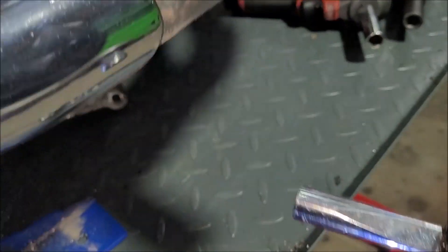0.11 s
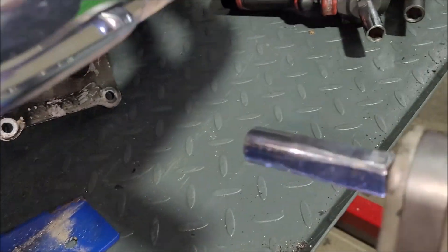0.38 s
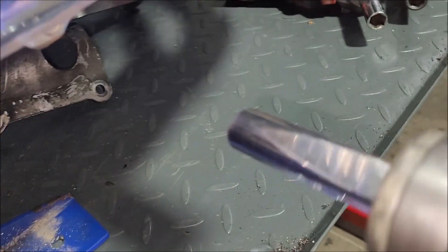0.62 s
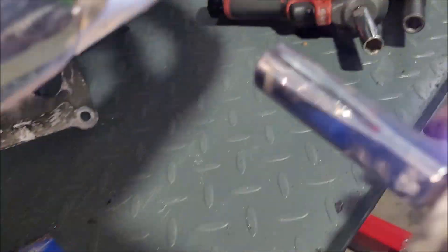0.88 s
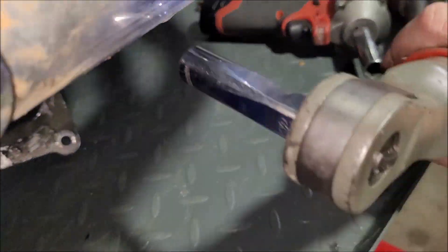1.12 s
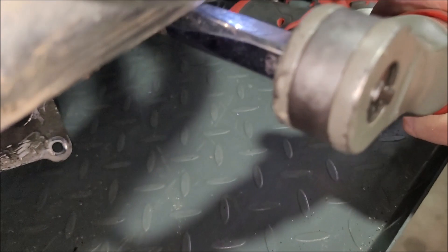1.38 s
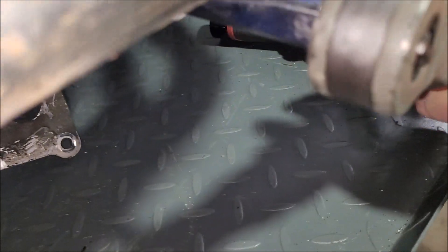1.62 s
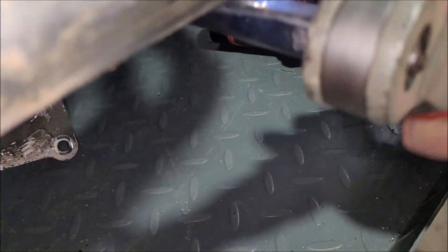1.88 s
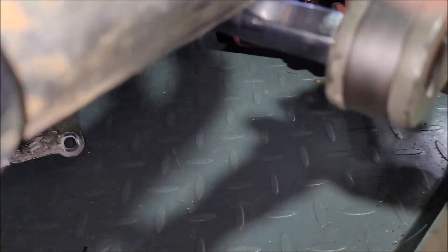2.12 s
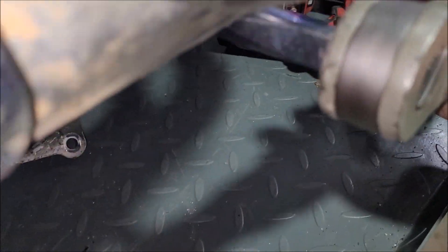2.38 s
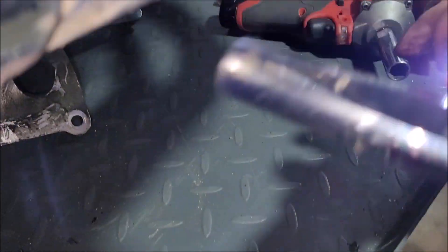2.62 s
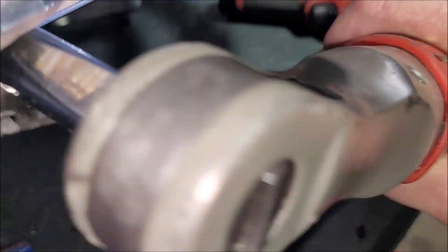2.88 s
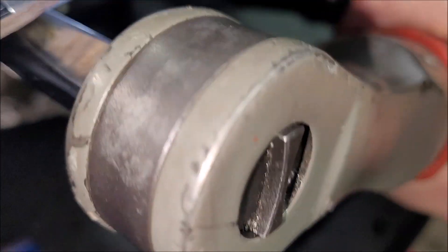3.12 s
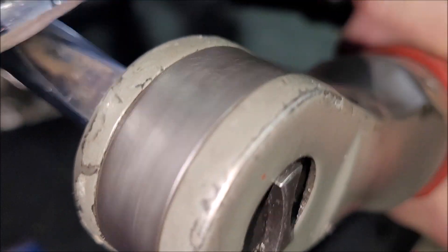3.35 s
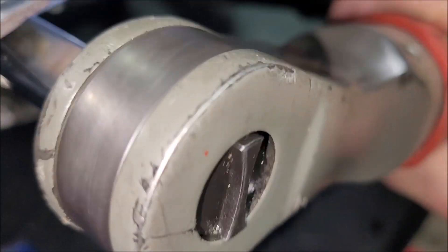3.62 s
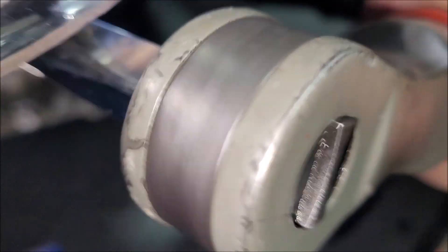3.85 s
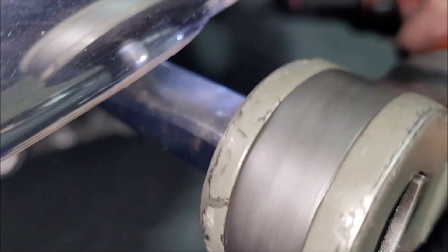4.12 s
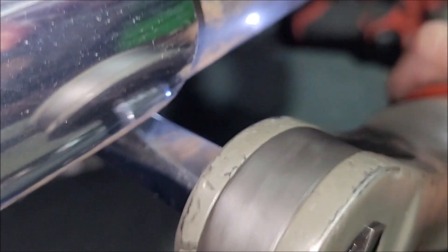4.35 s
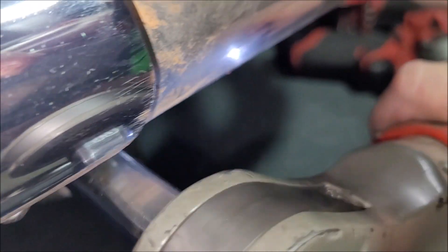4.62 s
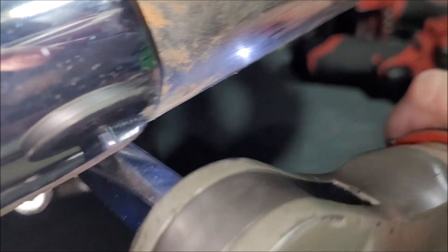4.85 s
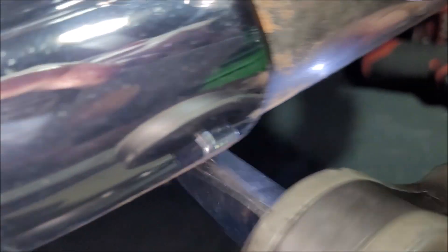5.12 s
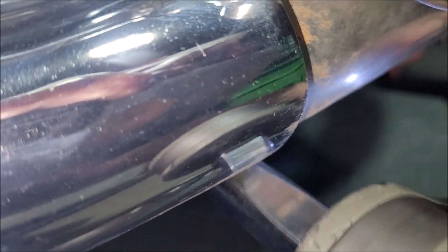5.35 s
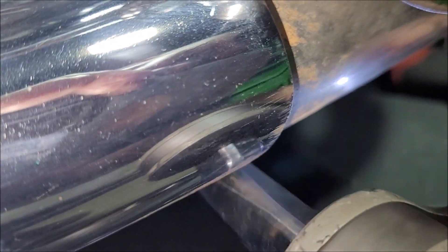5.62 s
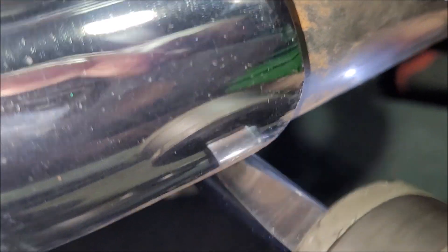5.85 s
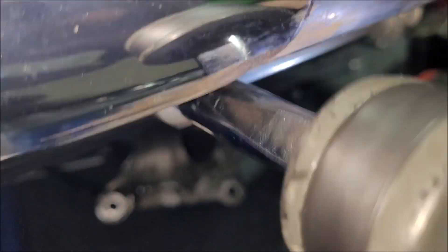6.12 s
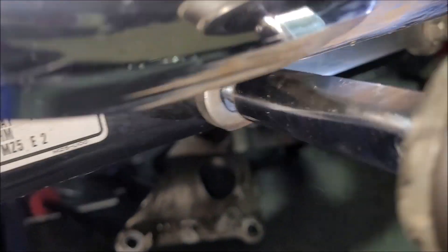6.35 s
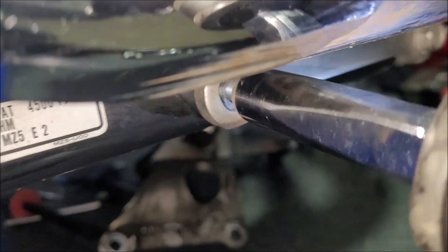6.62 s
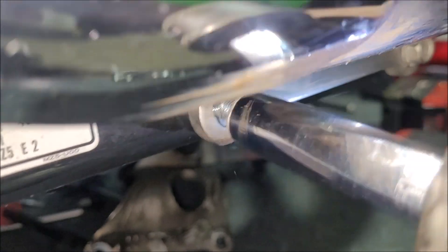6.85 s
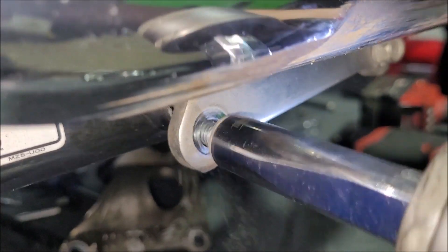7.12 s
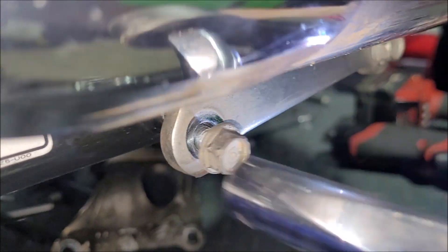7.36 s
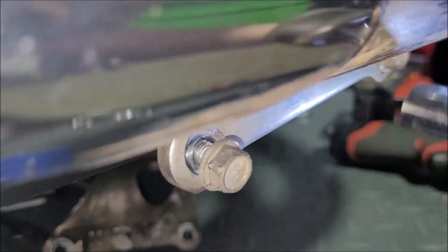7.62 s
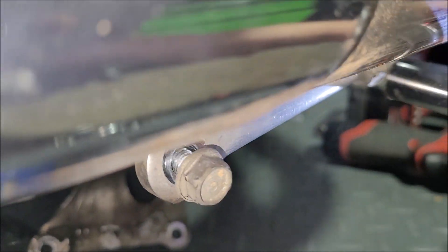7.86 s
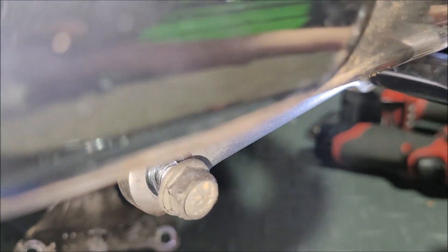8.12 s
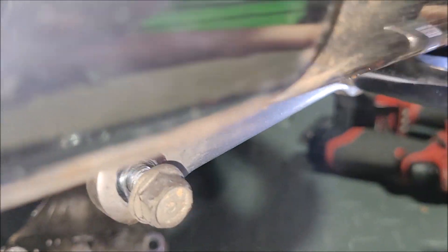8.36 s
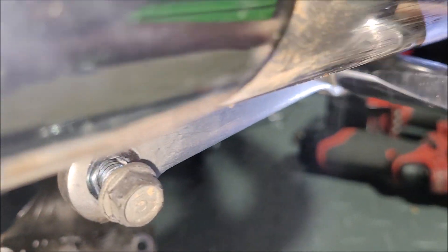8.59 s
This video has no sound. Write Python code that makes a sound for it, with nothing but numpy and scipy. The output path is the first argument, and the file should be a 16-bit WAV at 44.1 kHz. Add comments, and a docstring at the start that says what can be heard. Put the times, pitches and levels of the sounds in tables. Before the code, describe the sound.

Four short cordless ratchet bursts, socket clinks on metal, a half-second pull, then one long steady buzzing rattle, a few clinks and a final burst.

```python
"""A cordless ratchet loosens a bolt beside a chromed exhaust pipe in a small workshop, left of centre. Its
crank rocks a pawl 46 to 62 times a second: filtered noise grains make the gear rattle, noise bursts the pawl
snaps, a beaten noise band the frame hum, and sines locked to the crank the motor whine and the hum's clearest
lines. Mostly between the trigger pulls the socket clinks on bolt and pipe: decaying modes and noise cracks.
Soft thuds, low rumble, a far drone that sinks and room tone lie behind, with feedback delays for the room."""
import sys
import numpy as np
from scipy import signal
from scipy.fft import rfft, irfft, next_fast_len
from scipy.io import wavfile
from scipy.ndimage import uniform_filter1d

SR = 44100
rng = np.random.default_rng(int(sys.argv[2]) if len(sys.argv) > 2 else 0)


def invert_db(x):
    """Field ratio 10**(x/20) for x, a level in decibels (scalar or array-like)."""
    u = np.asarray(x, float) / 20
    return 10 ** u


def store_wav(level_fs):
    """Save 16-bit WAV to argv[1]."""
    pcm = np.round(np.clip(np.atleast_2d(level_fs), -1, 1) * 32767)
    wavfile.write(sys.argv[1], SR, pcm.T.astype(np.int16))


N = 384993
T = np.arange(N) / SR   # time [s]

# trigger pulls: (start [s], stop [s], relative rattle level [dB], rise time constant [s], drift [dB/s])
PULLS = [(0.021, 0.156, -21.5, .011, 9), (0.229, 0.326, -19, 0.029, -82), (0.514, 0.637, -17, 0.023, -69.5),
         (0.755, 0.879, -21.5, 0.016, 0.5), (1.893, 2.525, -20, 0.0087, -1),
         (3.392, 7.315, -24.5, 0.034, 0.7947), (8.15, 8.732, -26, 0.0061, 8.5)]
# crank in each pull, before sags: (time of one pawl stroke [s], full speed [strokes/s], spin-up time [s])
CRANK = [(.1, 46, .06), (.28, 46, .06), (.569, 46, .06), (.829, 47, .06), (2.3385, 61.5, .13),
         (4.973, 61.74, .17), (8.6215, 61.8, .1)]
# how grip and bolt let the housing sound, per pull: (lower resonance gain [dB], upper resonance gain [dB],
# rattle left over right [dB])
GRIP = [(-18, 7.5, 1), (-8, 1, 1.05), (-11.5, -6, 1.8), (-24, -4, 0.92), (0.5, -12.5, 3), (1, -23, 2.8),
        (-5, -1.5, 0.46)]
# per pull: (housing growl re rattle [dB], hum re rattle [dB], surge of the hum as the bolt resists [dB],
# hum left over right [dB])
STRAIN = [(9.5, -16, -7.5, 0), (4, -20, 2, 0.5), (5, -21.5, 1, 13), (2.5, -33, -6, 18), (6, -11, 3.5, -0.5),
          (0.5, -17.5, 17, -4.5), (2, -17, -3, -4.5)]
# slow change of the load on the bolt: (time [s], change of rattle [dB])
LOAD = [(3.4, -0.5), (4.3, 1.5), (5.3, 2), (6.4, 1), (6.9, -2.5), (8.15, 0), (8.52, 3.5), (8.73, -0.5)]
# the socket runs light for a moment: (time [s], drop of the rattle [dB])
SLIPS = [(2.129, 4), (2.439, 5), (3.87, 3.5), (4.412, 6.5), (4.938, 7), (5.489, 4.5), (5.971, 7),
         (7.291, 3)]
# the motor labours: (time [s], share of speed lost [1], Gaussian half width [s])
SAGS = [(6.04, .004, .06), (6.54, .006, .09)]
# relative rattle spectrum: (frequency [Hz], density [dB])
RATTLE_SPECTRUM = [(290, -25), (500, -17), (595, -11.5), (880, -2.5), (1180, -3.5), (1400, -4), (1870, -2),
                   (4940, 4.5), (8450, -2), (10200, 2), (15100, 1), (16000, -22.5)]
# housing resonances: (frequency [Hz], width [Hz])
HOUSING = [(1425, 150), (2200, 130)]
# a loose part takes up the rattle and sings: (peak time [s], frequency [Hz], width [Hz], gain [dB],
# Gaussian half length [s])
SINGS = [(0.251, 2130, 119.8, 12.5, 0.04), (0.886, 994, 151.5, 13.5, 0.018), (2.207, 4180, 349, 0.5, 0.37),
         (2.248, 1086, 90, 4.5, 0.033), (2.264, 2310, 130, 12.5, 0.033), (3.479, 1314, 253, 10.5, .02),
         (3.477, 4690, 499, 9, 0.011), (5.299, 5000, 1200, -9.5, .1), (8.553, 1437, 29.54, 14.5, 0.53)]
# pawl resonances: (frequency [Hz], width [Hz])
PAWL_MODES = [(9380, 450), (10250, 500)]
# how hard the pawl bites and which end of it sounds: (time [s], relative level [dB],
# upper over lower resonance [dB])
BITE = [(.1, -12, 2), (.29, -2.5, 12), (.58, -6.5, 11), (.83, -8, 8), (2.2, -11.5, 6), (3.6, -10.5, 5),
        (4.25, -13, 11), (4.55, -1, 5), (4.78, -8.5, -14), (5.0, -6.5, 3.5), (5.9, -5, 5.5),
        (6.05, -11.5, 9.5), (6.27, -2, -1.5), (6.5, -4.5, 4), (6.8, -3.5, -1), (7.25, -1.5, 8.5),
        (8.2, -9.5, -1.5), (8.73, -7, 5)]
# the hardest pawl snaps: (time [s], level re a usual snap [dB])
HARD_SNAPS = [(0.279, 7.5), (0.545, 4.5), (4.974, 9), (5.506, 10), (7.29, 3.5), (7.339, -2.5),
              (8.211, 10.5)]
# the hum's centre shifts with how the head bears on the bolt: (time [s], frequency [Hz])
HUM_CENTRE = [(1.95, 370), (2.03, 264), (2.35, 325), (2.53, 221), (3.5, 309), (4.6, 384), (7.3, 384),
              (8.4, 335)]
# tones locked to the crank, orders 4 to 7 the clearest lines of the frame hum, the others from the motor:
# (multiple of crank speed [1], mean level re rattle [dB])
WHINE = [(4.0, -38), (5.0, -37), (6.0, -34), (7.0, -29), (10.55, -37), (14.24, -28)]
# gear-mesh whistle: (time [s], mean level re rattle [dB])
MESH = [(3.5, -30), (5.4, -27), (5.8, -20), (6.55, -15.5), (7.3, -20), (8, -40)]
# touches of the socket, with a faint click of the trigger at 1.842 s among them: (time [s], strength [dB], pipe
# ring re strength [dB], socket ring re strength [dB], upper edge of the crack [Hz])
CLINKS = [(0.471, -32.5, -27, -23.5, 6500), (1.3869, -17.5, -37.5, -50.5, 3960),
          (1.498, -32, -37, -36, 3000), (1.5336, -12, -41, -32, 5900), (1.842, -36.5, -27, -12.5, 5140),
          (2.8789, -23, -28, 2, 5900), (2.959, -20, -28, -11, 4400), (3.069, -26.5, -34, -21, 4600),
          (3.106, -41, -25, -13, 4970), (3.35, -43.5, -23, -20, 5130), (3.3765, -44, -27, -23, 2000),
          (3.424, -15, -28, -31.5, 9000), (7.097, -8, -23, -27, 2190), (7.7678, -22.5, 0, -34, 5030),
          (7.8887, -14.5, -32, -38, 4500), (7.928, -24, -38, -35, 2800), (7.997, -23.5, -22, -33, 4940)]
# modes of the pipe: (frequency [Hz], level [dB], 60 dB decay time [s])
PIPE = [(1066, -27, 1.4), (5190, -3, .11), (1346, -15, .1), (5378, -17, .15), (1610, -12, .2),
        (3413, -18, .12), (2180, -10, .12), (2450, -11, .06), (3919, -15, .07), (2300, -15, .08),
        (4436, -17, .15), (5728, -22, .15), (6519, -16, .12), (7381, -22, .15), (12130, -24, .08)]
# modes of the socket: (frequency [Hz], level [dB], 60 dB decay time [s])
SOCKET = [(1658, -23, .5), (3805, -41, 2.2), (3348, -18, .1), (4242, -1, .065), (1911, -12, .12),
          (5125, -18, .18), (4414, -9, .07), (2299, -16, .13), (1400, -17, .14), (1516, -18, .12),
          (6810, -24, .11), (8107, -22, .06), (7440, -19, .09)]
# soft bumps of the hand: (time [s], strength [dB], frequency [Hz], 60 dB decay time [s])
THUDS = [(1.166, -37, 397, 0.06), (2.765, -25.5, 83.4, 0.061), (4.804, -21, 277, 0.012),
         (7.335, -29.5, 400, 0.05), (7.338, -44, 201, 0.23)]
# swells of low rumble at the microphones: (peak time [s], level [dB], twice the rise time constant [s],
# left over right [dB])
SWELLS = [(0.174, -33.5, 0.015, 9.5), (0.562, -37.5, 0.023, 28), (1.93, -32, 0.026, 9),
          (2.3, -35.5, 0.015, 17), (2.516, -27, 0.082, -26), (3.51, -26, 0.029, -1),
          (3.769, -45, 0.12, 6.5), (4.599, -43.5, 0.14, 16), (4.805, -26.5, 0.0057, 23),
          (4.94, -46.5, 0.093, 31), (6.4, -42, 0.091, 16.5), (6.858, -35.5, 0.028, 21),
          (8.386, -39, 0.026, 21)]
# far machine, relative spectrum: (frequency [Hz], density [dB])
DRONE = [(71, -32.5), (120, -14), (291, -5.5), (318, -15), (441, -9), (482, -20), (958, -16), (9000, -42.5),
         (11700, -47), (16000, -55)]
# faint tones of the drone: (frequency [Hz], amplitude re drone rms [dB])
DRONE_TONES = [(63, -0.5), (100, -3.5)]
# drone over time: (time [s], level [dB])
DRONE_LEVEL = [(0, -49), (1.9, -53), (2.8, -59), (3.2, -68.5), (7.8, -66.5), (8.0, -61.5), (8.73, -61)]
# room tone, relative spectrum: (frequency [Hz], density [dB])
ROOM_TONE = [(25, -25), (153, -20.5), (190, -11), (212, 0.5), (363, -5), (2610, -19.5), (16000, -53)]

RISE_DB, EARLY_GROWL = 29, 0.58   # the rattle starts this far down; share of that which reaches the growl offset
SURGE_S, SURGE_GROWL, HUM_FADE_DB_PER_S = 0.074, 0.46, 2.5
SLIP_S, RECOVER_S = 0.039, 0.082   # time constants of fall and recovery
SLIP_GROWL, SLIP_HUM = 0.13, 0.94   # shares of the drop won back by growl and hum, re rattle
PATCHY_DB = 2.3   # rms wander of each band of the rattle
HUM_OCTAVES, HUM_SKIRT = 0.65, 0.2   # width of the hum; share of its broad upper part until the grip changes
RETURN_BEAT, REGRIP_S = 0.55, 3.0   # until the grip changes the return stroke beats the frame too
MESH_ORDER = 57.08   # multiple of crank speed
KNOCK_S, KNOCK_DB = 2.557, -14.5
THICKET_DB, THICKET_DB_PER_OCTAVE, THICKET_T60_S = -20.5, -4.5, 0.1
CRACK_T60_S = 0.073
DEAD_DB, LEFT_DB, LEFT_PER_DB, LEFTMOST_DB = -32, 3, 0.25, 14.5
FRAME_DB, FRAME_T60_S = -30.5, 0.4
SWELL_TAIL, RUNNING_DB, IDLE_RE_DRONE_DB = 1.77, -49.5, -6   # fall over rise time; rumble between swells
ROOM_TONE_DB = -60
ROOM_T60_S, WALL_CUT_HZ, ROOM_DB = 0.41, 2020, -16


def crank():
    """Exponential spin-up: gate, turns (whole at each pawl stroke), layer levels, slip and grip over time."""
    gate, turns, levels, grip = np.zeros(N), np.zeros(N), np.zeros((4, N)), np.zeros((3, N))
    for pull, (stroke_s, speed, spin_s), strain, grip_db in zip(PULLS, CRANK, STRAIN, GRIP):
        start, stop, level_db, rise_s, drift = pull
        growl_db, hum_db, surge_peak_db, hum_pan_db = strain
        on = (T >= start - 0.01) & (T < stop + 0.04)

        def turned(s):
            """Integral of a speed that closes in on its top value."""
            return speed * (s + 0.35 * spin_s * np.exp((start - s) / spin_s))

        turns[on] = turned(T[on]) - turned(stroke_s)
        since = np.maximum(T[on] - start, 0)
        early_db = RISE_DB * np.exp(-since / rise_s)
        surge_db = surge_peak_db * since / SURGE_S * np.exp(1 - since / SURGE_S)
        load_db = np.interp(T[on], *np.transpose(LOAD))
        levels[0, on] = level_db - early_db + drift * since + load_db
        levels[1, on] = growl_db + EARLY_GROWL * early_db + SURGE_GROWL * surge_db
        levels[2, on] = hum_db + surge_db - HUM_FADE_DB_PER_S * since
        levels[3, on] = hum_pan_db
        grip[:, on] = np.array(grip_db)[:, None]
        gate += np.interp(T, [start - 0.008, start + 0.009, stop, stop + 0.029], [0, 1, 1, 0])
    lost = sum(share * np.exp(-((T - s) / width) ** 2) for s, share, width in SAGS)
    turns = turns - np.cumsum(lost * np.diff(turns, prepend=0))
    slip_db = sum(drop_db * hump(s, SLIP_S, RECOVER_S) for s, drop_db in SLIPS)
    levels = levels + np.outer([-1, SLIP_GROWL, SLIP_HUM, 0], slip_db)
    return gate, turns, levels, slip_db, grip


def gear_rattle(turns, on, growl_db, boost_db):
    """Dense random impacts: uneven grains, hardest just after each stroke, excite housing and loose parts."""
    reversal = np.diff(np.floor(turns - 0.02), prepend=0) == 1
    reversal = reversal * invert_db(4.56 * rng.standard_normal(N))
    load = invert_db(np.cos(2 * np.pi * (turns - 0.2))) + 0.13 * dying(reversal, 0.41)
    clumps = invert_db(2.4 * rms_one(band(rng.standard_normal(N), 40, 300)))
    heights = invert_db(1.7 * np.minimum(rng.exponential(1, (2, N)), 5))
    grains = heights * rng.standard_normal((2, N)) * load * clumps   # each microphone hears other teeth
    teeth = patchy(coloured(grains, RATTLE_SPECTRUM))
    sung = 0
    for s, hz, width, gain_db, half_s in SINGS:
        sung = sung + np.exp(-((T - s) / half_s) ** 2) * resonances(teeth, [(hz, width, gain_db)])
    housing = resonances(teeth, [(hz, width, gain) for gain, (hz, width) in zip(boost_db, HOUSING)])
    teeth = teeth + sung + housing
    low = signal.lfilter(*signal.butter(1, 2500, fs=SR), teeth)
    growl_db = growl_db + 0.57 * rms_one(band(rng.standard_normal(N), 2.3, 7.2))   # the colour wanders
    return (teeth + (invert_db(growl_db) - 1) * low) / np.std(band(teeth, 1500, 11900)[:, on])


def patchy(x):
    """Independent modulation of adjoining bands: each swells and sinks on its own."""
    lows = [signal.sosfilt(signal.butter(2, hz, fs=SR, output="sos"), x) for hz in (1200, 2400, 4000, 6500)]
    parts = np.diff([0 * x] + lows + [x], axis=0)
    return sum(part * invert_db(PATCHY_DB * rms_one(band(rng.standard_normal(N), 1.6, 20.1))) for part in parts)


def pawl_snaps(strokes, luck, pawl_db, upper_db, on):
    """Impulsive excitation: the pawl skips over a tooth or two, each a burst of a few ms through its modes."""
    snaps = np.zeros(N)
    first = strokes + (0.0006 * SR * luck[:, 0]).astype(int)
    second = strokes + ((0.002 + 0.002 * luck[:, 2]) * SR).astype(int)
    snaps[np.clip(first, 0, N - 1)] = invert_db(2.8 * luck[:, 1])
    snaps[np.clip(second, 0, N - 1)] += invert_db(-5 + 4.0 * luck[:, 3])
    hard_s, hard_db = np.transpose(HARD_SNAPS)
    snaps[(hard_s * SR).astype(int)] = invert_db(hard_db)
    envelope = uniform_filter1d(dying(snaps, 0.011), size=80, origin=39)   # onset spread over 1.8 ms
    burst = envelope * rng.standard_normal((2, N))
    ends = resonances(burst, [(*PAWL_MODES[0], -upper_db / 2), (*PAWL_MODES[1], upper_db / 2)])
    pawl = resonances(ends, [(9820, 1300, 0)]) + 0.2 * band(burst, 6700, 12000)
    return invert_db(pawl_db - 3.5) * pawl / np.std(pawl[:, on])


def frame_hum(strokes, luck, on):
    """Forced vibration: each stroke beats the frame, noise joins in, and a moving band-pass shapes the hum."""
    beats = np.zeros(N)
    beats[strokes] = invert_db(4.9 * luck[:, 4])
    halfway = strokes[:-1] + np.minimum(np.diff(strokes), SR // 40) // 2
    early = strokes[:-1] < REGRIP_S * SR
    beats[np.minimum(halfway, N - 1)] = RETURN_BEAT * early * invert_db(2.0 * luck[:-1, 1])
    frame = beats / np.std(beats[on]) + 0.55 * rng.standard_normal(N) + 0.6 * rng.standard_normal((2, N))
    centre_hz, edges = np.interp(T, *np.transpose(HUM_CENTRE)), np.geomspace(175, 465, num=7)
    hum = 0
    for low, high in zip(edges, edges[1:]):
        octaves = np.log2(np.sqrt(low * high) / centre_hz)
        hum = hum + band(frame, low, high) * np.exp(-(octaves / HUM_OCTAVES) ** 2)
    hum = band(hum, 170, 470) + HUM_SKIRT * (T < REGRIP_S) * band(frame, 480, 1100)
    hum = hum * invert_db(1.9 * rms_one(band(rng.standard_normal(N), 5.3, 12.8)))   # it comes in lumps
    return hum / np.std(hum[:, on])


def motor_whine(turns):
    """Order tones: sines at fixed multiples of the crank speed, each wavering in level."""
    tones = WHINE + [(MESH_ORDER, np.interp(T, *np.transpose(MESH)))]
    waver = [2.5 * rms_one(band(row, 2.5, 25)) for row in rng.standard_normal((len(tones), N))]
    waver[-1] = 0.25 * waver[-1]   # the mesh whistle is steadier
    whine = 0
    for (order, level_db), waver_db in zip(tones, waver):
        whine = whine + invert_db(level_db + waver_db) * np.sqrt(2) * np.sin(2 * np.pi * order * turns)
    return whine


def ratchet():
    """Superposition of rattle, snaps, hum and whine on one crank; also returns the gate and stroke jolts."""
    gate, turns, (rattle_db, growl_db, hum_db, hum_pan_db), slip_db, (*boost_db, pan_db) = crank()
    on = gate > 0.5
    rattle = gear_rattle(turns, on, growl_db, boost_db)
    strokes = np.nonzero((np.diff(np.floor(turns + 0.04)) == 1) & (gate[1:] > 0.1))[0]
    luck = rng.standard_normal((len(strokes), 5))   # uneven strength and timing
    bite_s, bite_db, upper_db = np.transpose(BITE)
    pawl_db = np.interp(T, bite_s, bite_db) + 0.78 * slip_db   # the pawl goes on through a slip
    pawl = pawl_snaps(strokes, luck, pawl_db, np.interp(T, bite_s, upper_db), on)
    hum = invert_db(hum_db) * frame_hum(strokes, luck, on)
    tool = panned(rattle + motor_whine(turns), pan_db) + panned(pawl, 17.1) + panned(hum, hum_pan_db)
    jolts = np.zeros(N)
    jolts[strokes] = invert_db(1.8 * luck[:, 4])
    return tool * gate * invert_db(rattle_db + 1.5), gate, jolts


def head_knock():
    """Impulse response: the head stops short against the pipe and rings one low mode of pipe and of socket."""
    knock = invert_db(KNOCK_DB) * (np.arange(N) == round(KNOCK_S * SR))
    rung = sum(invert_db(level_db) * ring(knock, hz, t60) for hz, level_db, t60 in (PIPE[0], SOCKET[0]))
    return rung * [[1], [0.5]]


def struck_modes(at, rows, sides):
    """Modal superposition: each touch strikes every mode of pipe and socket with a strength of its own."""
    out, lasting = np.zeros((2, 2, N))
    for modes, ring_db in ((PIPE, rows[:, 2]), (SOCKET, rows[:, 3])):
        luck = rng.standard_normal((len(rows), len(modes)))
        for k, (hz, level_db, t60) in enumerate(modes):
            clicks = np.zeros((2, N))
            phase = -1 if k % 3 == 2 else 1   # every third mode is opposed at the right
            clicks[:, at] = sides * invert_db(rows[:, 1] + ring_db + level_db + 1.5 * luck[:, k]) * [[1], [phase]]
            target = lasting if t60 > 0.9 else out
            target += ring(clicks, hz, t60)
    return out, lasting


def mode_thicket(at, rows):
    """High modal density: ninety faint modes spread at random lie between the main ones."""
    out, span = np.zeros((2, N)), np.arange(SR // 4)
    hz = 1300 * 2 ** rng.uniform(0, 3.5, (90, 1))
    level_db = THICKET_DB_PER_OCTAVE * np.log2(hz / 4000) - 60 * span / SR / THICKET_T60_S
    faint = invert_db(level_db) * np.sin(2 * np.pi * hz * span / SR)
    struck = rng.standard_normal((len(rows), 2, len(hz)))
    for i, weights, touch_db in zip(at, struck, rows[:, 1] + rows[:, 2:4].max(axis=1)):
        out[:, i + span] += invert_db(touch_db + THICKET_DB) * (weights @ faint)
    return out


def cracks(at, rows, sides):
    """Contact noise: a decaying noise burst, partly through the pipe modes broadened by damping."""
    out, span = np.zeros((2, N)), np.arange(SR // 4)
    shades_db = 10.0 * rng.standard_normal((len(rows), len(PIPE)))
    fall_db = -60 * span / SR / CRACK_T60_S
    for i, side, peak_db, top_hz, shade_db in zip(at, sides.T, rows[:, 1], rows[:, 4], shades_db):
        hiss = rng.standard_normal((2, len(span)))
        crack = rms_one(band(hiss, 990, top_hz) + 0.18 * (top_hz / 6000) ** 2 * hiss[::-1])
        # held metal: the same modes, blurred
        damped = resonances(crack, [(mode[0], 220, db) for mode, db in zip(PIPE, shade_db)])
        out[:, i + span] += invert_db(peak_db - 10.0 + fall_db) * side[:, None] * rms_one(crack + damped)
    return out


def frame_murmur(at, rows):
    """Structure-borne sound: every clink also shakes a low decaying murmur out of the frame."""
    shaken = np.zeros(N)
    shaken[at] = invert_db(rows[:, 1] + FRAME_DB)
    hiss = rng.standard_normal((2, N))
    return rms_one(band(hiss + hiss.sum(axis=0), 270, 530)) * dying(shaken, FRAME_T60_S)


def clinks():
    """Impact radiation: modes, thicket and crack lose their bass; the longest rings are returned apart."""
    rows = np.array(CLINKS)
    at = np.round(rows[:, 0] * SR).astype(int)
    # a freely ringing touch lies further left than a dead one
    free_db = rows[:, 2:4].max(axis=1) - DEAD_DB
    sides = invert_db(np.outer([0.5, -0.5], np.minimum(LEFT_DB + LEFT_PER_DB * free_db, LEFTMOST_DB)))
    out, lasting = struck_modes(at, rows, sides)
    out = out + mode_thicket(at, rows) + cracks(at, rows, sides)
    high_pass = signal.butter(5, 1080, "high", fs=SR, output="sos")   # small parts radiate no bass
    return signal.sosfilt(high_pass, out) + frame_murmur(at, rows), lasting


def thuds():
    """Damped oscillation: short low rings from a soft contact."""
    out = np.zeros(N)
    for s, strength_db, hz, t60 in THUDS:
        click = np.zeros(N)
        click[round(s * SR)] = invert_db(strength_db)
        out += ring(click, hz, t60)
    return out


def rumble(gate, jolts):
    """Partly coherent low noise in lumps; while the tool runs each stroke also pushes, mostly at the left."""
    lumps = invert_db(5.5 * rms_one(band(rng.standard_normal((2, N)), 10.2, 27)))
    push = band(jolts, 41, 120)
    push = gate * push / np.std(push[gate > 0.5]) * [[0.8], [0.1]]
    noise = rng.standard_normal((3, N))
    low = push + rms_one(band((noise[1:] + 0.48 * noise[0]) * lumps, 27, 190))
    idle_db = IDLE_RE_DRONE_DB + np.interp(T, *np.transpose(DRONE_LEVEL))
    level = invert_db(RUNNING_DB) * gate + invert_db(idle_db)
    for s, level_db, length, pan_db in SWELLS:
        level = level + panned(invert_db(level_db) * hump(s, length / 2, SWELL_TAIL * length / 2), pan_db)
    return low * level


def shop():
    """Stationary coloured noise as room tone, and a partly coherent far drone with faint tones that sinks."""
    noise = rng.standard_normal((2, 3, N))
    tones = sum(invert_db(db) * np.sin(2 * np.pi * hz * T + [[0], [1.6]]) for hz, db in DRONE_TONES)
    drone = coloured(noise[0, 1:] + 0.93 * noise[0, 0], DRONE) + tones
    tone = coloured(noise[1, 1:] + 0.63 * noise[1, 0], ROOM_TONE)
    return invert_db(ROOM_TONE_DB) * tone + invert_db(np.interp(T, *np.transpose(DRONE_LEVEL))) * drone


def room(x):
    """Reverberation by recirculation: six feedback delays a side, duller on every round."""
    size = next_fast_len(N + SR)
    w = 2 * np.pi * np.arange(size // 2 + 1) / size
    dull = 1 / (1 + 1j * w * SR / (2 * np.pi * WALL_CUT_HZ))
    walls = np.zeros((2, len(w)), complex)
    for k, lag in enumerate(rng.uniform(0.012, 0.037, 12)):
        loop = invert_db(-60 * lag / ROOM_T60_S) * dull ** (lag / 0.15) * np.exp(-1j * w * round(lag * SR))
        walls[k % 2] += (-1) ** (k // 2) * loop / (1 - loop)
    return irfft(rfft(x, size) * walls, size)[:, :N]


def rms_one(x):
    """Normalisation to unit root mean square."""
    return x / np.sqrt(np.mean(x ** 2) + 1e-20)


def band(x, low_hz, high_hz):
    """Butterworth band-pass: maximally flat between its edges."""
    return signal.sosfilt(signal.butter(2, [low_hz, high_hz], "band", fs=SR, output="sos"), x)


def coloured(x, spectrum):
    """Spectral weighting by (frequency [Hz], density [dB]), normalised to rms 1."""
    size = next_fast_len(N)
    hz, level_db = np.transpose(spectrum)
    bins_hz = np.arange(size // 2 + 1) * SR / size
    gain = invert_db(np.interp(np.log(bins_hz + 1), np.log(hz), level_db))
    return rms_one(irfft(rfft(x, size) * gain, size)[..., :N])


def resonances(x, peaks):
    """Parallel two-pole resonators of about unit peak gain, scaled: (frequency [Hz], width [Hz], gain [dB])."""
    out = 0
    for hz, width, level_db in peaks:
        r = np.exp(-np.pi * width / SR)
        top, bottom = [(1 - r * r) / 2, 0, (r * r - 1) / 2], [1, -2 * r * np.cos(2 * np.pi * hz / SR), r * r]
        out = out + invert_db(level_db) * signal.lfilter(top, bottom, x)
    return out


def ring(clicks, hz, t60):
    """Damped oscillator: a unit click starts a decaying sine of initial amplitude about 1."""
    r, w = invert_db(-60 / (t60 * SR)), 2 * np.pi * hz / SR
    return signal.lfilter([0, np.sin(w)], [1, -2 * r * np.cos(w), r * r], clicks + 1e-18)


def dying(clicks, t60):
    """Exponential decay: each click starts an envelope that falls 60 dB in t60 seconds."""
    return signal.lfilter([1], [1, -invert_db(-60 / (t60 * SR))], clicks + 1e-18)


def hump(peak_s, rise_s, fall_s):
    """Two-sided exponential: height 1 at peak_s, falling away on both sides."""
    t = T - peak_s
    return np.exp(np.where(t < 0, t / rise_s, -t / fall_s))


def panned(x, pan_db):
    """Interchannel level difference: lean the sound to the left by pan_db."""
    return x * invert_db(np.array([pan_db / 2, -pan_db / 2]).reshape(2, -1))


def scene():
    """Direct and reverberant sound of tool and clinks, with the unreverberated layers added."""
    tool, gate, jolts = ratchet()
    touches, lasting = clinks()
    near = tool + touches
    close = rumble(gate, jolts) + head_knock()
    # faint long rings reach the microphones only directly
    return near + invert_db(ROOM_DB) * room(near[::-1]) + lasting + close + thuds() + shop()


def low_pass(x):
    """Removes everything above the highest recorded frequency."""
    return signal.sosfilt(signal.butter(12, 16240, fs=SR, output="sos"), x)


def record(dry):
    """Band-limiting and soft saturation: the deepest bass is lost, peaks are rounded, the top is cut."""
    rounded = np.tanh(signal.sosfilt(signal.butter(2, 34, "high", fs=SR, output="sos"), dry))
    mix = signal.sosfilt(signal.cheby2(10, 60, 16600, fs=SR, output="sos"), rounded)
    return low_pass(mix)


dry = scene()
out = record(dry)
store_wav(out)
```